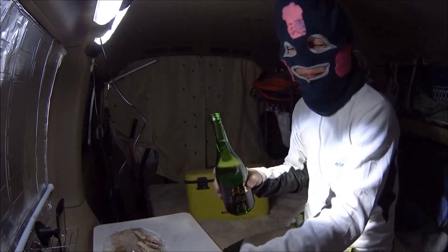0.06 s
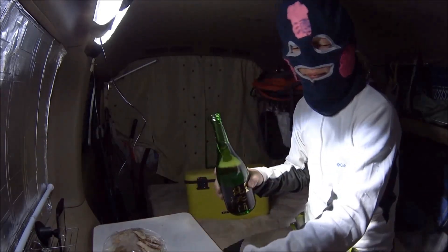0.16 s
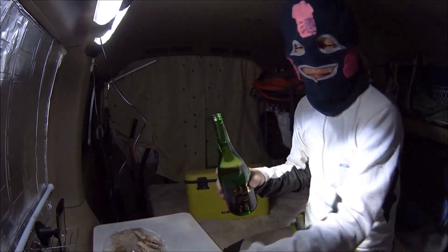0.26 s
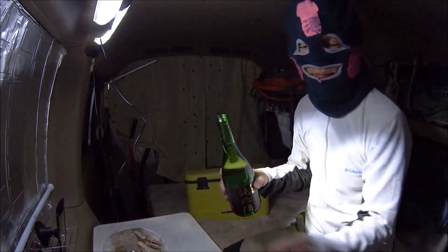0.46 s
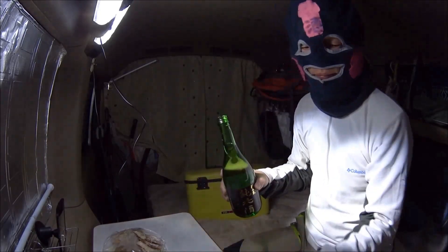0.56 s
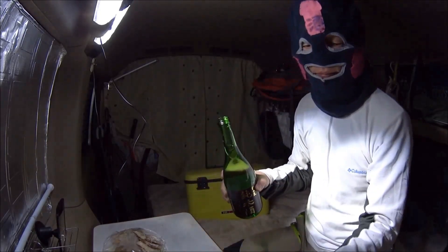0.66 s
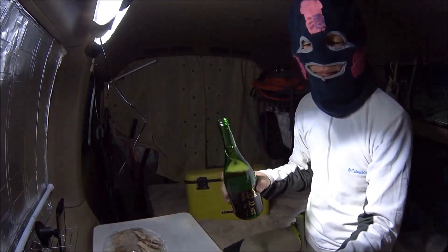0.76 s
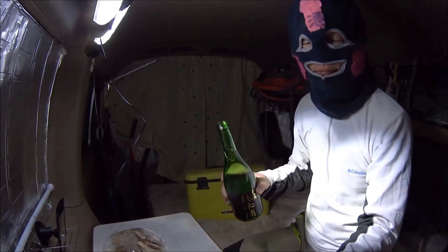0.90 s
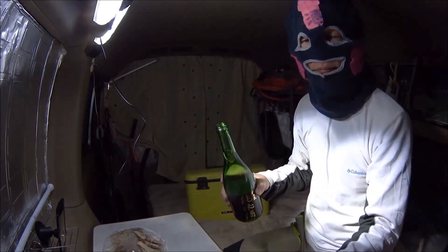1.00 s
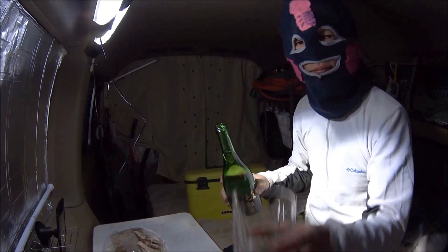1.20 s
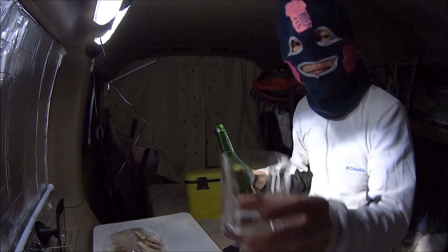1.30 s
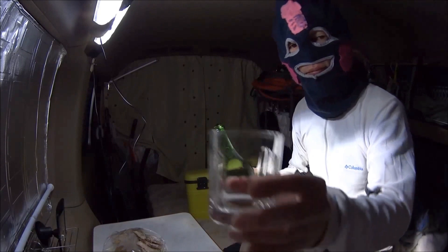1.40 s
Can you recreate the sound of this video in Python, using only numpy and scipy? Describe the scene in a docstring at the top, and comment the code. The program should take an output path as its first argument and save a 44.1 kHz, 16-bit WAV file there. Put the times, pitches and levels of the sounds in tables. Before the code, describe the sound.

Small metal, probably a bottle opener and cap, clinks brightly on a table, knocks again and settles with scratchy little clicks. A sleeve then rustles faintly, with one soft bump, heard close up inside a quiet van.

```python
"""Inside a quiet van, small metal, probably the cap and opener of a glass bottle, clinks on a table.
Impacts excite the damped modes of metal and table top: one bright ringing hit, a duller knock, then
a scratchy run of clicks and sliding friction, all reflected by the close walls. A sleeve rustles
as the arm draws back, with one soft bump and a thin swish, over a faint steady hiss."""
import sys
import numpy as np
from scipy import signal
from scipy.fft import rfft, irfft
from scipy.io import wavfile

SR = 44100
rng = np.random.default_rng(int(sys.argv[2]) if len(sys.argv) > 2 else 0)


def wav_out(sig):
    """Save sig, one row per channel (or a flat mono array), as 16-bit PCM at SR to the path in sys.argv[1]."""
    wavfile.write(sys.argv[1], SR, np.round(np.clip(np.atleast_2d(sig).T, -1, 1) * 32767).astype(np.int16))


N = 63945
TIME = np.arange(N) / SR

# Impacts of metal on the table. Each row: start in seconds, knock level in dB, clack level in dB,
# clack pitch in Hz, tick level in dB, tick pitch in Hz.
CONTACTS = [(0.2041, -34, -18, 2970, -11, 7600), (0.2068, -64, -18, 2670, -16, 7280),
            (0.2237, -43, -24, 2400, -34, 4860), (0.2472, -42.5, -26, 2620, -34, 5300),
            (0.2666, -30, -16.5, 2080, -19.5, 4350), (0.2711, -39.5, -34, 2230, -35, 4300),
            (0.2804, -68, -36, 3200, -28.5, 7300), (0.3072, -54, -41.5, 2740, -60, 4200),
            (0.3566, -47, -46.5, 2230, -39, 7500), (0.3596, -49, -54, 5160, -29.5, 6900),
            (0.3626, -48, -65, 4330, -26.5, 9700), (0.3835, -47.5, -36, 2340, -33.5, 4370),
            (0.3939, -47.5, -40.5, 2120, -44, 5900), (0.4012, -43.5, -45, 1860, -30, 6000),
            (0.4070, -42, -39, 2050, -31.5, 4450), (0.4180, -49.5, -49, 2200, -33, 5500),
            (0.4224, -46, -48, 1900, -36, 5260), (0.4348, -45.5, -46, 2060, -43.5, 5340)]


def from_db(db):
    """Amplitude grows tenfold for every 20 dB."""
    return 10 ** (np.asarray(db) / 20)


def unit_rms(x):
    """Dividing by the RMS gives a signal unit power."""
    return x / np.sqrt(np.mean(x ** 2) + 1e-20)


def pan(db):
    """A level difference, left minus right, gives a source its direction."""
    return from_db(np.array([[db], [-db]]) / 2)


def butterworth(x, order, hz, kind):
    """A maximally flat filter passes one range of frequencies."""
    return signal.sosfilt(signal.butter(order, hz, kind, fs=SR, output="sos"), x + 1e-18)


def colour(x, points):
    """Weighting the spectrum by a curve of (Hz, dB) points sets the timbre."""
    hz, db = np.transpose(points)
    freqs = np.maximum(np.fft.rfftfreq(N, 1 / SR), 1)
    return irfft(rfft(x) * from_db(np.interp(np.log(freqs), np.log(hz), db)), N)


def decay(start, t60):
    """Damping makes a sudden vibration fall exponentially, by 60 dB in t60 seconds."""
    age = TIME - start
    return (age >= 0) * np.exp(-np.log(1000) * np.clip(age / t60, 0, 10))


def mode(start, hz, t60):
    """A struck resonance vibrates as a damped sinusoid."""
    return decay(start, t60) * np.sin(2 * np.pi * hz * (TIME - start))


def burst(start, hz, octaves, t60):
    """Dying micro-impacts sum to noise, in a band reaching `octaves` to either side of hz."""
    edges = np.clip([hz / 2 ** octaves, hz * 2 ** octaves], 20, [SR / 3, SR / 2.2])
    envelope = decay(start, t60)
    band = butterworth(envelope * rng.choice([-1, 1], N), 2, edges, "band")
    return unit_rms(band) * np.sqrt(np.mean(envelope ** 2))  # same energy at any bandwidth


def diffuse(points):
    """Diffuse noise is only partly correlated between the ears, here least in the low middle."""
    # Stereo width. Each row: frequency in Hz, side minus mid level in dB.
    width = [(60, -21.5), (150, -10), (300, -5), (700, 4), (2000, -0.5), (6000, -7), (11000, -8.5)]
    mid, side = colour(rng.standard_normal((2, N)), points)
    return mid + colour(side, width) * np.array([[1], [-1]])


def waver(hz):
    """Low-passed noise fluctuates slowly, with unit power."""
    return unit_rms(butterworth(rng.standard_normal(N), 2, hz, "low"))


def hiss():
    """Stationary broadband noise is heard as a faint, even background."""
    # Spectrum of the hiss. Each row: frequency in Hz, level in dB.
    spectrum = [(15, -51), (27, -10), (96, -7.5), (156, -7.5), (288, -2.5), (400, -4), (490, -7.5),
                (668, -6.5), (1030, -9.5), (1800, -10.5), (5820, -21.5), (11000, -28), (14300, -57)]
    return from_db(-60) * unit_rms(diffuse(spectrum))


def table_knocks():
    """Each impact excites the normal modes of the hollow table top and a burst of noise."""
    # Table top modes. Each row: frequency in Hz, level in dB, T60 in seconds, left minus right in dB.
    table_modes = [(458, -22.5, .1, 18), (668.5, -5, 0.15, -12), (707, -21.5, 0.11, -9.5),
                   (926, -9, 0.063, -7), (1512, -4, 0.082, 8.5), (1542, -12, 0.18, -0.5),
                   (1900, -19, 0.51, -7.5)]
    out = np.zeros((2, N))
    for start, knock_db, *_ in CONTACTS:
        knock = from_db(1) * burst(start, hz=1150, octaves=0.57, t60=0.075)
        for hz, db, t60, pan_db in table_modes:
            knock = knock + pan(pan_db) * from_db(db) * mode(start, hz, t60)
        out += from_db(knock_db) * knock
    return out


def table_shudder():
    """The table shudders low under each knock; incoherent vibrations add in power."""
    # Spectrum of the shudder. Each row: frequency in Hz, level in dB.
    spectrum = [(30, -10.5), (55, -17), (150, -1), (250, -14), (500, -17)]
    power = sum((from_db(knock_db) * decay(start, t60=0.16)) ** 2 for start, knock_db, *_ in CONTACTS)
    return from_db(-14.5) * np.sqrt(power) * unit_rms(diffuse(spectrum))


def metal_clacks():
    """Impact gives a sharp tick and excites the metal's modes, which drop fast and then linger."""
    # Modes of metal pressed on the table. Each row: frequency in Hz, level in dB, lingering T60 in seconds.
    pressed_modes = [(2000, -5, 0.09), (2198, -2, 0.067), (2262, -16.5, 0.05), (2529, 0, .11),
                     (2700, -2, .08), (2845, -8, .1), (3297, -1, 0.027), (4267, 1.5, 0.091)]
    rise_s, fast_t60_s, linger_db, width_octaves = 0.00045, 0.025, -22.5, 0.39
    out = np.zeros(N)
    for start, _, clack_db, clack_hz, tick_db, tick_hz in CONTACTS:
        clack = from_db(-5.5) * burst(start, clack_hz, octaves=0.34, t60=fast_t60_s)
        for hz, db, t60 in pressed_modes:
            # modes near the clack's pitch respond most
            excitation = 1 / (1 + (2 * np.log2(hz / clack_hz) / width_octaves) ** 2)
            vibration = mode(start, hz, fast_t60_s) + from_db(linger_db) * mode(start, hz, t60)
            clack += excitation * from_db(db) * vibration
        clack *= 1 - np.exp(-np.maximum(TIME - start, 0) / rise_s)
        tick = burst(start, tick_hz, octaves=0.24, t60=0.0046)
        splash = from_db(-2.5) * burst(start, hz=7760, octaves=1.0, t60=0.0092)
        out += from_db(clack_db) * clack + from_db(tick_db) * (tick + splash)
    return out


def metal_rings():
    """Metal left free rings in lightly damped high modes; lighter touches leave single pings."""
    # Moments of free ringing. Each row: start in seconds, level in dB.
    rings = [(0.2041, -18.5), (0.2804, -47), (0.419, -50.5)]
    # Modes of the free metal. Each row: frequency in Hz, level in dB, T60 in seconds.
    free_modes = [(6237, -12, .135), (6443, -17, .11), (6731, -12.5, .15), (7208, -2, .135),
                  (10581, -15, .13), (10938, -21, .13)]
    # Light touches. Each row: start in seconds, frequency in Hz, level in dB.
    pings = [(0.2805, 3990, -46), (0.2805, 9045, -52), (0.3596, 4980, -42.5)]
    out = np.zeros(N)
    for start, ring_db in rings:
        out += sum(from_db(ring_db + db) * mode(start, hz, t60) for hz, db, t60 in free_modes)
    for start, hz, db in pings:
        out += from_db(db) * mode(start, hz, t60=0.16)
    return out


def body_response(x):
    """Resonances and antiresonances colour the clatter; small parts radiate little bass."""
    # Peaks and hollows of metal on the table top. Each row: frequency in Hz, gain in dB, Q.
    resonances = [(476, 10, 8.7), (561, -8.5, 4.9), (706, 5, 8.2), (810, -1, 16), (1050, -4, 2.3),
                  (1704, -9.5, 35), (2286, 9.5, 23), (3397, 7.5, 7), (3860, -6, 13), (4340, 8, 10),
                  (5280, 6, 22), (5900, -8.5, 13), (8360, 6.5, 21), (10560, -3.5, 6.7)]
    for hz, db, q in resonances:
        angle, gain = 2 * np.pi * hz / SR, from_db(db / 2)
        damping = np.sin(angle) / (2 * q)
        numerator = [1 + damping * gain, -2 * np.cos(angle), 1 - damping * gain]
        denominator = [1 + damping / gain, -2 * np.cos(angle), 1 - damping / gain]
        x = signal.lfilter(numerator, denominator, x + 1e-18)
    return butterworth(x, order=3, hz=445, kind="high")


def cabin(x):
    """Close surfaces return dull early reflections; absorbent padding keeps the reverberation short."""
    # Reflections from walls and roof. Each row: delay in milliseconds, level in dB.
    echoes = [(2.8, -7.5), (3.9, -11.5)]
    # Spectrum of the reverberation. Each row: frequency in Hz, level in dB.
    spectrum = [(150, -16), (600, -9), (2500, -17.5), (5000, -9.5), (8000, -16), (11000, -11.5)]
    dull = butterworth(x, order=1, hz=710, kind="low")
    early = np.zeros((2, N))
    for ms, db in echoes:
        delayed = np.array([np.interp(TIME - ms / 1000, TIME, side, left=0) for side in dull])
        early += from_db(db) * delayed
    fade = decay(0.003, t60=0.12)
    tail = diffuse(spectrum) * fade / np.sqrt(np.sum(fade ** 2))
    return x + early + signal.fftconvolve(x, tail, axes=1)[:, :N]


def metal_scrape():
    """Between clicks the metal slides, and friction breaks its motion into dense tiny slips."""
    # Envelope of the scrape. Each row: time in seconds, level in dB.
    levels = [(0.29, -68), (0.335, -59.5), (0.362, -55), (0.378, -54.5), (0.41, -60), (0.48, -74)]
    # Spectrum of the scrape. Each row: frequency in Hz, level in dB.
    spectrum = [(500, 7), (1500, 2), (3000, 3), (6000, -14), (11000, -10)]
    slips_per_s, spread_db = 3300, 8
    slips = (rng.random(N) < slips_per_s / SR) * rng.choice([-1, 1], N)
    strengths = from_db(spread_db * rng.standard_normal(N))
    envelope = from_db(np.interp(TIME, *np.transpose(levels), left=-np.inf, right=-np.inf))
    return envelope * unit_rms(colour(slips * strengths, spectrum))


def sleeve_rustle():
    """Sliding cloth radiates soft friction noise as the arm draws back."""
    # Envelope of the rustle. Each row: time in seconds, level in dB.
    levels = [(0.3, -69), (0.46, -61.5), (0.55, -59), (0.72, -58.5), (0.79, -60.5), (0.88, -64.5),
              (1.02, -66.5), (1.22, -67.5), (1.44, -72.5)]
    # Spectrum of the rustle. Each row: frequency in Hz, level in dB.
    spectrum = [(200, -3), (700, -2), (1500, -3.5), (2000, 3.5), (2700, -0.5), (4600, 2), (5600, -5.5),
                (7000, -0.5), (8100, -1), (9000, -9), (11000, -14.5)]
    return from_db(np.interp(TIME, *np.transpose(levels))) * unit_rms(diffuse(spectrum))


def sleeve_whistles():
    """Narrow bands of noise are heard as faint, unsteady pitches gliding within the rustle."""
    # Whistles. Each row: start and length in seconds, first and last frequency in Hz, level in dB.
    glides = [(0.437, 0.13, 4730, 4340, -62.5), (0.568, 0.12, 2012, 1980, -65),
              (0.491, 0.28, 8450, 7730, -70), (0.795, 0.036, 5850, 7200, -67.5),
              (0.855, 0.045, 6370, 6830, -69), (0.925, 0.085, 7070, 7080, -70),
              (0.978, 0.059, 4200, 4150, -72), (1.06, 0.14, 4635, 4614, -76)]
    wander_fraction, wander_hz, half_width_hz = 0.00903, 40.2, 62
    out = np.zeros(N)
    for start, length, first_hz, last_hz, db in glides:
        progress = np.clip((TIME - start) / length, 0, 1)
        hz = (first_hz + (last_hz - first_hz) * progress) * (1 + wander_fraction * waver(wander_hz))
        phase = 2 * np.pi * np.cumsum(hz) / SR
        band = waver(half_width_hz) * np.cos(phase) + waver(half_width_hz) * np.sin(phase)
        out += from_db(db) * np.sin(np.pi * progress) * band
    return out


def soft_bump():
    """Something hollow is nudged and touches again, each time with resonance and brief friction noise."""
    # Modes of the hollow object. Each row: frequency in Hz, level in dB, T60 in seconds.
    hollow_modes = [(404.7, -2.5, 0.31), (966, -7.5, 0.15), (4000, -11, 0.22)]
    # Spectrum of the rubbing. Each row: frequency in Hz, level in dB.
    spectrum = [(200, -6), (440, 8), (750, -6), (1400, -2), (3800, -9), (6000, -21.5)]
    out = np.zeros((2, N))
    for start, touch_db in [(0.835, 0), (0.88, -3.5)]:
        ring = sum(from_db(db - 53) * mode(start, hz, t60) for hz, db, t60 in hollow_modes)
        rub = from_db(-54.5) * decay(start, t60=0.31) * unit_rms(diffuse(spectrum))
        out += from_db(touch_db) * (rub + pan(5.5) * ring)
    return out


def sleeve_swish():
    """Cloth friction gives one thin swell of treble noise as the arm reaches out."""
    peak_s, width_s = 1.215, 0.027
    treble = butterworth(rng.standard_normal(N), order=2, hz=7440, kind="high")
    return from_db(-61.5) * np.exp(-((TIME - peak_s) / width_s) ** 2) * unit_rms(treble)


def scene():
    """The reverberant clatter, the handling sounds and the hiss add by superposition."""
    metal = pan(3) * (metal_clacks() + metal_rings())
    clatter = cabin(body_response(metal + table_knocks() + metal_scrape()))
    sleeve = sleeve_rustle() + sleeve_swish() + sleeve_whistles()
    return clatter + sleeve + table_shudder() + soft_bump() + hiss()


def record(dry):
    """An elliptic low-pass filter limits the bandwidth, cutting the top treble steeply."""
    cutoff_hz = 11000
    return signal.sosfilt(signal.ellip(10, .3, 70, cutoff_hz, fs=SR, output="sos"), dry)


dry = scene()
out = record(dry)
wav_out(out)
```